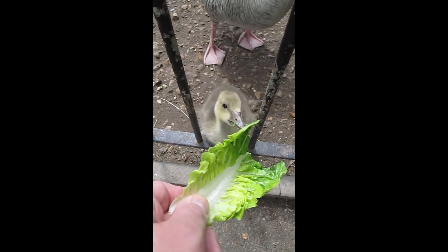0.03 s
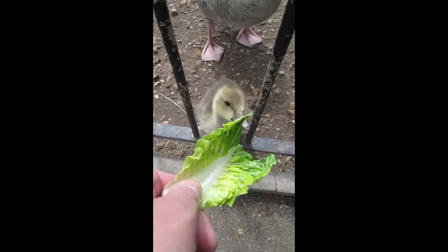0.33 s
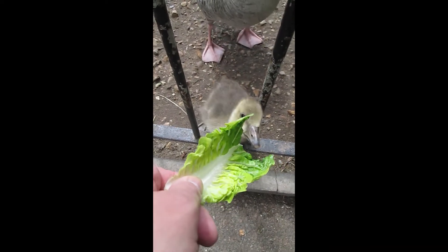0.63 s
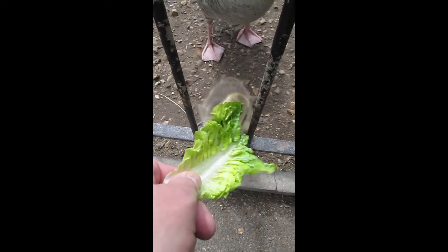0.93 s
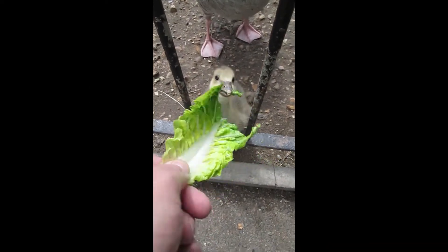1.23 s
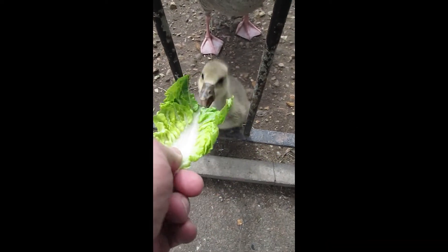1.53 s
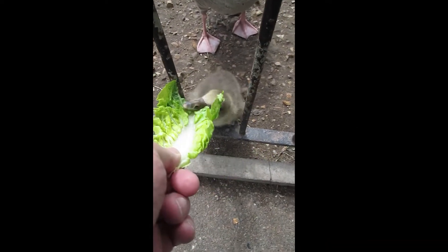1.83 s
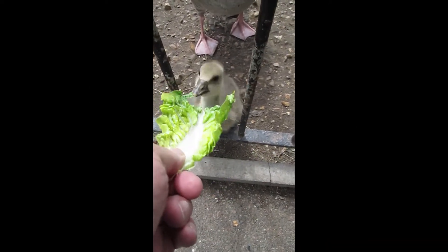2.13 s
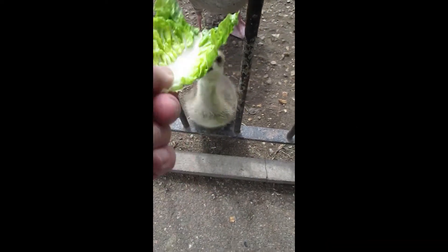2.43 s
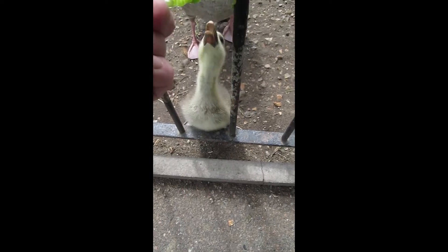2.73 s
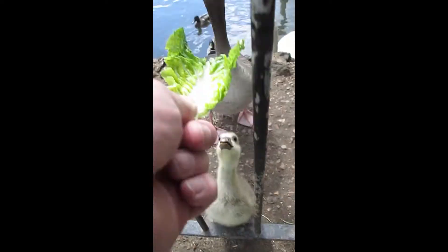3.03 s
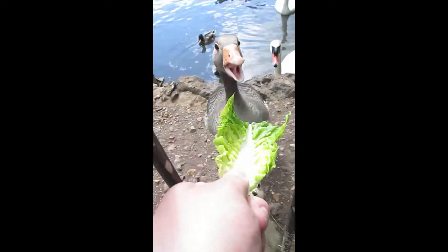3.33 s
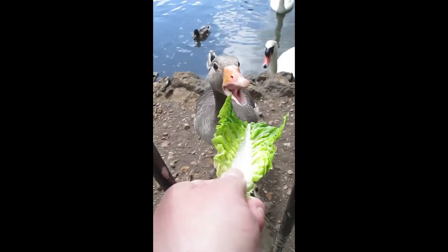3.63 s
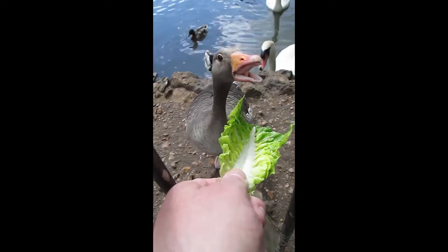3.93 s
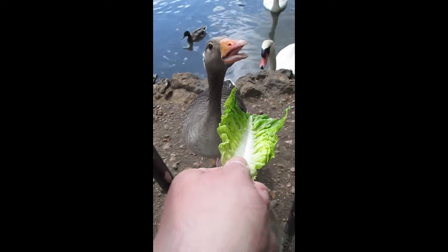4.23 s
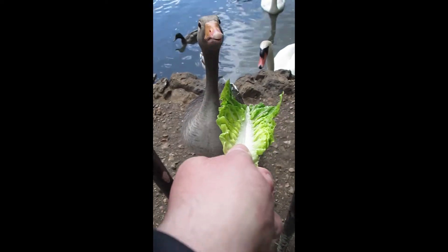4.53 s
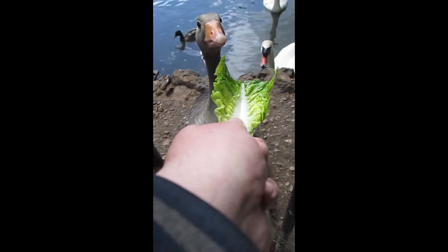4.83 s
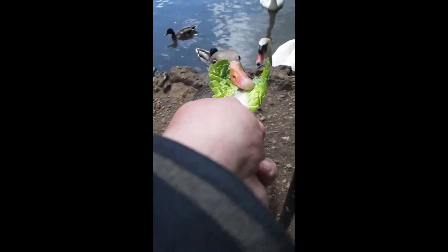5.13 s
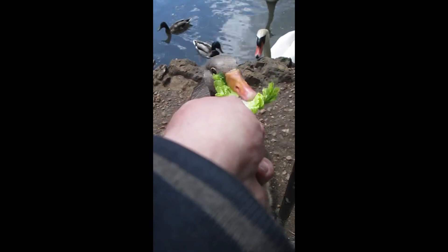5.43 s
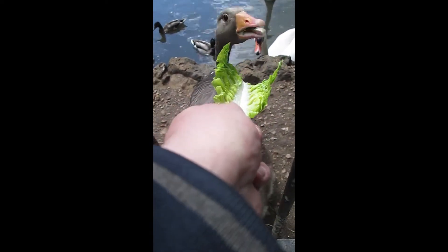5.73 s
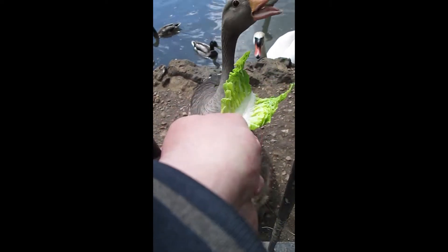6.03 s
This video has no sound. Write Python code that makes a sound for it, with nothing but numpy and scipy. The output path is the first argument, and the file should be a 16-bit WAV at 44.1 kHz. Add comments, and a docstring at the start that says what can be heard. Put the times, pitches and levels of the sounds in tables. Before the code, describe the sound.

A gosling peeps near the microphone and a lettuce leaf snaps and crackles as it is bitten. A pigeon coos twice with a throaty roll. Then a goose hisses loudly for about a second, the gosling peeps on, the leaf is crunched again and the goose ends with short husky hisses. Behind them are thin distant bird calls and a park's airy rumble, which dips after the loudest sounds.

```python
"""A gosling peeps in bright, arching notes and tears crisp bites from a lettuce leaf held through a railing
at a pond: veins snap and cells crackle. Its parent forces a hiss through its open beak and snaps at the
leaf too. Pigeons coo with throbbing throats and other young birds whistle further off. A limiter ducks
at each loud snap or hiss, so the steady rush of the park sinks and creeps back."""
import sys
import numpy as np
from scipy import signal
from scipy.fft import rfft, irfft, next_fast_len
from scipy.io import wavfile
from scipy.ndimage import uniform_filter1d, minimum_filter1d

SR = 44100
rng = np.random.default_rng(int(sys.argv[2]) if len(sys.argv) > 2 else 0)


def digitize_waveform(pressure):
    """Quantize a signal to 16-bit integers and store it at the path in sys.argv[1].

    Rows of a 2-D input are taken as channels; values are limited to [-1, 1].
    """
    field = np.atleast_2d(pressure).T
    bounded = np.clip(field, -1, 1)
    quanta = np.round(bounded * 32767).astype(np.int16)
    wavfile.write(sys.argv[1], SR, quanta)


N = 272097
TIME = np.arange(N) / SR
FFT_SIZE = next_fast_len(N)
FREQS = np.maximum(np.arange(FFT_SIZE // 2 + 1) * SR / FFT_SIZE, 1)


def ramp(start, length):
    """Rises from 0 to 1 over the given time."""
    return np.clip((TIME - start) / length, 0, 1)


def from_db(db):
    """Decibels to gain."""
    return 10 ** (np.asarray(db) / 20)


def rms_one(x):
    """Scaled to an rms of 1."""
    return x / np.sqrt(np.mean(x ** 2) + 1e-20)


def drift(hz):
    """A random modulator that moves mostly slower than hz; rms 1."""
    spectrum = rfft(rng.standard_normal(FFT_SIZE)) / (1 + (FREQS / hz) ** 2)
    return rms_one(irfft(spectrum, FFT_SIZE)[:N])


def coloured(spectrum):
    """Noise shaped by an EQ curve; rms 1."""
    hz, db = np.transpose(spectrum)
    gain = from_db(np.interp(np.log(FREQS), np.log(hz), db))
    return rms_one(irfft(rfft(rng.standard_normal(FFT_SIZE)) * gain, FFT_SIZE)[:N])


def resonate(x, hz, width):
    """A two-pole resonance with unity gain at its peak."""
    r = np.exp(-np.pi * width / SR)
    feedback = [1, -2 * r * np.cos(2 * np.pi * hz / SR), r * r]
    return signal.lfilter(np.array([1, 0, -1]) * (1 - r * r) / 2, feedback, x + 1e-18)


def cut(x, hz, kind, order=2):
    """A high- or low-pass."""
    sections = signal.butter(order, np.minimum(hz, .45 * SR), kind, fs=SR, output="sos")
    return signal.sosfilt(sections, x + 1e-18)


def phase_of(hz):
    """Running phase of a pitch curve."""
    return 2 * np.pi * np.cumsum(hz) / SR


def arch(s, length, edge_hz, shoulder_hz, top_hz, rise_share=.6):
    """A note that rises and falls: its samples, its progress (-1 start, 0 top, 1 end) and its pitch."""
    start, end = s - rise_share * length, s + (1 - rise_share) * length
    at = np.arange(int(start * SR), int(end * SR))
    progress = np.interp(at / SR, [start, s, end], [-1, 0, 1])
    rounding = np.sin(np.pi * progress / 2) ** 2
    # the period lengthens away from the top, aiming for the shoulder pitch half way out
    period_span = 1 / edge_hz - 1 / top_hz
    half = (1 / shoulder_hz - 1 / top_hz) / period_span
    blend = np.clip(4 * half - 1, -.6, 1.5)
    stretch = blend * rounding + (1 - blend) * progress ** 2
    return at, progress, 1 / (1 / top_hz + period_span * stretch)


def cavity(modes, low_hz, high_hz):
    """Turbulent air ringing in a set of resonances; rms 1."""
    air = sum(from_db(db) * resonate(rng.standard_normal(N), hz, width) for hz, width, db in modes)
    return rms_one(cut(cut(air, low_hz, "high"), high_hz, "low", order=4))


def outdoors(x, echo_db=-28, t60=.22):
    """Adds a short scatter from the path, the railing and the bank."""
    age = TIME[:SR // 2]
    tail = cut(rng.standard_normal(len(age)), 5100, "low") * from_db(-60 * age / t60)
    return x + from_db(echo_db) * signal.fftconvolve(x, tail / np.sqrt(np.sum(tail ** 2)))[:N]


# EQ curve of the ambience bed: f/Hz, relative level/dB
PARK_SPECTRUM = [(15, -40), (25, -6.5), (70, -2.5), (165, -1.5), (330, -5), (580, -5.5), (1030, -11),
                 (2360, -16.5), (3050, -11), (4500, -7.5), (5400, -13), (7500, -31), (12000, -46),
                 (15600, -76)]


def park(level_db=-29.5, waver_db=2.0):
    """The bed: distant rumble with an airy rush above it."""
    return from_db(level_db + waver_db * drift(22.0)) * coloured(PARK_SPECTRUM)


# distant hoots: start t/s, length/s, f/Hz, level/dB
FAR_HOOTS = [(2.322, 0.19, 486, -31), (2.478, 0.28, 326.6, -30), (4.212, 0.19, 338, -32.5),
             (6.053, 0.23, 320.5, -30.5)]


def far_pigeons(sag=0.131, jitter=0.032, rough_db=5.5):
    """Soft, grainy hoots that sag in pitch."""
    out, wobble = np.zeros(N), drift(87)
    for start, length, hz, db in FAR_HOOTS:
        progress = ramp(start, length)
        swell = np.sqrt(4 * progress * (1 - progress))
        out += from_db(db) * swell * np.sin(phase_of(hz * (1 - sag * progress + jitter * wobble)))
    return out * from_db(rough_db * drift(60))


# distant whistles: top t/s, length/s, top f/Hz, level/dB
FAR_WHISTLES = [(0.536, 0.15, 4900, -33.5), (1.465, 0.1, 5600, -31.5), (1.62, .08, 5300, -29.5),
                (2.156, 0.096, 5940, -29), (2.371, .076, 5640, -28), (2.869, 0.076, 5760, -29.5),
                (4.877, .24, 5400, -34.5)]


def far_birds(flutter_db=2):
    """Thin, high arches of tone from other young birds."""
    out = np.zeros(N)
    for s, length, top_hz, db in FAR_WHISTLES:
        at, progress, hz = arch(s, length, edge_hz=.78 * top_hz, shoulder_hz=.92 * top_hz, top_hz=top_hz)
        out[at] += from_db(db) * np.sqrt(1 - progress ** 2) * np.sin(phase_of(hz))
    return out * from_db(flutter_db * drift(55))


# the near pigeon's coos: start t/s, length/s, f/Hz, level/dB
NEAR_COOS = [(.258, .635, 378, -17.5), (2.41, .65, 351.5, -14.5)]
# quickening throbs that open each coo: t/s from its start
OPENING_THROBS = [0, .1, .205, .259, .292]


def pigeon(swing=0.22, jitter=0.0564, rough_db=3.5, crop_hz=395, crop_octaves=0.58):
    """Separate throbs, each sagging in pitch, speed up into a roll that smooths into a falling note."""
    throb_s, throb_hz, throb_db, droop_hz_per_s, overtone_db = .0076, 330, -.5, 3500, -9
    roll_at_s, roll_hz, roll_depth = .318, 49.4, 0.71
    fall_s, drop_share, fade_db = 0.16, 0.45, -14.5
    out, wobble, rough, lag = np.zeros(N), drift(79), drift(150), .15 * drift(15.0)
    for start, length, hz, db in NEAR_COOS:
        for offset in OPENING_THROBS:
            age = TIME - start - offset
            at = np.abs(age) < 4 * throb_s
            phase = phase_of(throb_hz - droop_hz_per_s * age[at])
            tone = np.sin(phase) + from_db(overtone_db) * np.sin(1.75 * phase)
            out[at] += from_db(db + throb_db) * np.exp(-(age[at] / throb_s) ** 2) * tone
        gate = ramp(start + roll_at_s - throb_s, throb_s) * (1 - ramp(start + length, throb_s))
        fall = ramp(start + length - fall_s, fall_s)
        roll = 2 * np.pi * roll_hz * (TIME - start - roll_at_s) + lag
        depth = roll_depth * (1 - fall) ** 3
        vibrato = 1 + swing * depth * np.sin(roll) + jitter * wobble
        tremolo = 1 - depth * (1 + np.cos(roll)) / 2
        phase = phase_of(hz * (1 - drop_share * fall ** 1.7) * vibrato)
        # the inflated crop resonates, so the octave takes over as the note falls
        in_crop = hz * (1 - drop_share * fall ** 2.37) / crop_hz
        voice = sum(np.exp(-(np.log2(k * in_crop) / crop_octaves) ** 2) * np.sin(k * phase)
                    for k in (1, 2))
        out += gate * from_db(db + fade_db * fall ** 4 + rough_db * depth * rough) * tremolo * voice
    return out


# formants of the goose's throat and mouth: f/Hz, width/Hz, relative level/dB
THROAT_MODES = [(450, 85, -8.5), (823, 123, .5), (1080, 90, -18), (1267, 140, -3.5), (1425, 160, -8),
                (1844, 130, -8.5), (2230, 110, -7), (2710, 530, -6)]
MOUTH_MODES = [(3350, 240, 0), (3720, 100, .5), (4140, 240, -4.5), (4390, 320, -2.5), (5320, 320, -2.5)]
# EQ curve of the air jet: f/Hz, relative level/dB
JET_SPECTRUM = [(2820, -33), (4800, -7.5), (6510, 2), (6800, -1.5), (7620, -10), (8840, -11), (9860, -12.5),
                (13100, -40.5), (15000, -61)]


def airway():
    """Three layers of breath: air in the throat, in the mouth and through the slit over the tongue."""
    return cavity(THROAT_MODES, 330, 3150), cavity(MOUTH_MODES, 1900, 5250), coloured(JET_SPECTRUM)


# husky surges of breath: peak t/s, rise/s, fall/s, level/dB
HUFF_SURGES = [(5.63, 0.11, 0.073, -24), (5.785, 0.042, 0.03, -18), (5.914, 0.022, 0.037, -13),
               (6.081, 0.051, 0.0098, -16.5), (6.175, 0.018, .03, -18.5)]


def huffs(throat, mouth, jet, mouth_db=1, jet_db=-8, beak_db=-10, rasp_db=2.0):
    """A rasping hiss with the hollow ring of the half-shut beak."""
    breath = sum(from_db(db) * np.exp(np.minimum((TIME - s) / rise, (s - TIME) / fall))
                 for s, rise, fall, db in HUFF_SURGES)
    hollow = rms_one(resonate(rng.standard_normal(N), hz=1080, width=220))
    air = breath * (throat + from_db(beak_db) * hollow + from_db(mouth_db) * mouth + from_db(jet_db) * jet)
    air *= from_db(rasp_db * drift(140))
    # the reflection off the moving hand that holds the leaf sweeps notches through the hiss
    bounce_gain, bounce_s, sway = .75, 0.00079, 0.306
    delay = bounce_s * np.exp(sway * drift(3.13))
    return (air + bounce_gain * np.interp(TIME - delay, TIME, air)) / np.hypot(1, bounce_gain)


# open-beaked hisses: start t/s, release t/s, full level/dB, mouth over throat/dB, full edge f/Hz
OPEN_HISSES = [(-.7, .16, -35, 4.5, 4600), (3, 4.165, -7, -0.5, 6330)]


def goose(swell_s=.7, swell_db=34.5, swell_curve=2.2, release_db_per_s=519.5, flutter_db=.45):
    """The parent forces air through its beak: hisses that build and cut off, then a run of huffs."""
    opening_s, shut_mouth_db, shut_jet_db, jet_db = 0.25, 10, -20, 6
    edge_start_hz, edge_width_hz, edge_db = 4900, 750, 2.5
    throat, mouth, jet = airway()
    out, eddies = np.zeros(N), cut(rng.standard_normal((2, N)), edge_width_hz / 2, "low")
    for start, release, db, mouth_db, edge_hz in OPEN_HISSES:
        slack = (1 - ramp(start, swell_s)) ** swell_curve
        release_db = release_db_per_s * np.maximum(TIME - release, 0)
        breath = ramp(start, 0.017) * from_db(db - swell_db * slack - release_db)
        # the whistling edge of the jet glides to its full pitch as the breath builds
        phase = phase_of(edge_hz + (edge_start_hz - edge_hz) * slack)
        edge = rms_one(eddies[0] * np.cos(phase) + eddies[1] * np.sin(phase))
        # until the beak is open the mouth booms and the jet is weak
        shut = 1 - ramp(start, opening_s)
        mouth_gain = from_db(mouth_db + shut_mouth_db * shut)
        jet_gain = from_db(jet_db + shut_jet_db * shut)
        out += breath * (throat + mouth_gain * mouth + jet_gain * jet + from_db(edge_db) * edge)
    return out * from_db(flutter_db * drift(28)) + huffs(throat, mouth, jet)


# resonances of the crisp leaf: f/Hz, width/Hz, relative level/dB
LEAF_MODES = [(1370, 1200, -16), (2910, 2040, -6), (3900, 2600, -3.5), (5470, 900, 1.5), (6090, 970, -6),
              (9550, 3900, -25)]
# veins snapping in a beak: t/s, peak level/dB before the low-pass
VEIN_SNAPS = [(.7562, -8.5), (.8126, -10), (0.8654, -13), (.934, -3), (.965, 3.5), (1.4088, -10.5),
              (1.629, -3.5), (1.759, 4), (2.0406, -5), (2.0534, 11), (5.0424, -11), (5.0586, 3.5),
              (5.127, 6.5), (5.3076, 9), (5.4583, 13.5)]
# bursts of tearing: middle t/s, length/s, level/dB
LEAF_TEARS = [(0.806, 0.047, -23), (0.866, 0.024, -28), (.91, 0.032, -27.5), (0.971, 0.038, -18.5),
              (1.723, 0.27, -31), (1.917, 0.04, -20.5), (2.064, 0.042, -11.5), (5.073, 0.043, -14.5),
              (5.13, 0.051, -17), (5.292, 0.08, -16), (5.465, 0.063, -9)]


def leaf(cells_per_s=2500, size_db=2.0, colour_db=4, top_hz=8000, aftersnap_s=.012, aftersnap_db=-0.5):
    """Veins snap among the crackle of bursting cells; each break is a tiny, bright click."""
    snaps, tearing = np.zeros(N), np.zeros(N)
    click = signal.unit_impulse(256)
    # a second fibre gives way just after each vein
    waits = aftersnap_s * (.5 + rng.random(len(VEIN_SNAPS)))
    breaks = list(VEIN_SNAPS) + [(s + wait, db + aftersnap_db) for (s, db), wait in zip(VEIN_SNAPS, waits)]
    for s, db in breaks:
        tint_db = colour_db * rng.standard_normal(len(LEAF_MODES))
        snap = sum((-1) ** k * from_db(level_db + tint_db[k]) * resonate(click, hz, width)
                   for k, (hz, width, level_db) in enumerate(LEAF_MODES))
        at = int(s * SR)
        snaps[at:at + len(click)] += from_db(db) * snap / np.abs(snap).max()
    for s, length, db in LEAF_TEARS:
        tearing += from_db(db) * np.exp(-np.abs(2 * (TIME - s) / length) ** 3)
    bursts = rng.random(N) < cells_per_s / SR
    cells = bursts * from_db(size_db * np.minimum(rng.exponential(1, N), 4))
    crackle = sum(from_db(db) * resonate(cells * rng.standard_normal(N), hz, width)
                  for hz, width, db in LEAF_MODES)
    return cut(snaps + tearing * rms_one(crackle), top_hz, "low", order=4)


# the gosling's peeps: top t/s, length/s, top f/Hz, level/dB, level change at the top/dB
GOSLING_PEEPS = [(0.271, 0.062, 2338, -3, 1), (0.432, 0.082, 3300, -5.5, -19.5),
                 (0.609, 0.085, 3350, -4.5, -7), (2.602, 0.053, 2150, -11, -3), (2.758, .054, 2120, -8, -5),
                 (2.919, 0.062, 2355, -8.5, -7.5), (3.838, .055, 2250, -8, -3),
                 (3.986, 0.067, 2530, -3, -0.5), (4.128, 0.061, 2910, -2.5, -6),
                 (4.281, 0.081, 3210, 0, -11), (4.485, 0.086, 3510, -4, -10.5), (5.185, 0.048, 2230, -6, 0),
                 (5.333, 0.075, 2630, -4, -1), (5.491, 0.063, 3100, -7.5, -10)]
# sheen on each peep: harmonic number, relative level/dB
PEEP_HARMONICS = [(2, -17), (3, -22)]


def gosling(jitter=0.01, flutter_db=1.16, second_voice_db=-4, strain_hz=3050, split_hz=400):
    """Arched near-sines; on the highest peeps the two sides of the syrinx part in pitch."""
    edge_hz, base_shoulder_hz, shoulder_tracking = 1670, 1887, .27
    edge_db, fall_db = -16, -9   # soft ends and a weaker falling side
    out, wobble, flutter = np.zeros(N), drift(250), drift(120)
    for s, length, top_hz, level_db, top_db in GOSLING_PEEPS:
        shoulder_hz = base_shoulder_hz * (top_hz / edge_hz) ** shoulder_tracking
        at, progress, hz = arch(s, length, edge_hz, shoulder_hz, top_hz)
        hz *= 1 + jitter * wobble[at]
        phase = phase_of(hz)
        strain = np.exp(-10 * progress ** 2) * (top_hz > strain_hz)
        second_voice = from_db(second_voice_db) * strain * np.sin(phase_of(hz + split_hz * strain))
        contour_db = np.interp(progress, [-.8, -.48, -.35, -.18, .15, .55, 1],
                               [edge_db, 0, 0, top_db, top_db, fall_db, fall_db + edge_db])
        voice = from_db(contour_db) * (np.sin(phase) + second_voice)
        harmonics = sum(from_db(db) * np.sin(k * phase) for k, db in PEEP_HARMONICS)
        sheen_gain = (1 - progress ** 2) * from_db(fall_db * (progress + 1) / 2)
        sheen = sheen_gain * cut(harmonics, 6400, "low", order=8)
        fade = np.clip(10 * (1 - np.abs(progress)), 0, 1)
        out[at] += fade * from_db(level_db + flutter_db * flutter[at]) * (voice + sheen)
    return out


def scene(side_db=-12.0):
    """A nearly dry foreground, wetter distant birds and the bed, all centred; only the treble spreads."""
    near = outdoors(gosling() + leaf() + goose() + pigeon())
    far = outdoors(far_birds() + far_pigeons(), echo_db=-8.5)
    mid = near + far + park()
    scatter = rng.standard_normal(128)
    diffuse = signal.fftconvolve(mid, scatter / np.sqrt(np.sum(scatter ** 2)))[:N]
    side = from_db(side_db) * cut(diffuse, 8000, "high")
    return mid + side * [[1], [-1]]


def limiter(x, threshold_db=-23.5, sidechain_hz=4050, recovery_s=0.51, start_duck_db=11):
    """Starts ducked; clamps at once when the treble passes the threshold, then recovers slowly."""
    power = uniform_filter1d(cut(x.mean(axis=0), sidechain_hz, "high") ** 2, size=32)
    over_db = np.maximum(10 * np.log10(np.abs(power) + 1e-12) - threshold_db, 0)
    over_db[0] = start_duck_db
    recovery = np.exp(-TIME / recovery_s)
    duck_db = np.maximum.accumulate(over_db / recovery) * recovery
    return x * from_db(uniform_filter1d(minimum_filter1d(-duck_db, size=48), size=48))


def record(dry, hiss_db=-62.5, cutoff_hz=15850, dc_offset=-.005):
    """The output chain: limiter, faint electronic hiss, a steep high cut and a slight DC offset."""
    hiss = from_db(hiss_db) * cut(rng.standard_normal((2, N)), 4000, "high")
    high_cut = signal.ellip(10, .1, 80, cutoff_hz, fs=SR, output="sos")
    return signal.sosfilt(high_cut, limiter(dry) + hiss) + dc_offset


dry = scene()
out = record(dry)
digitize_waveform(out)
```